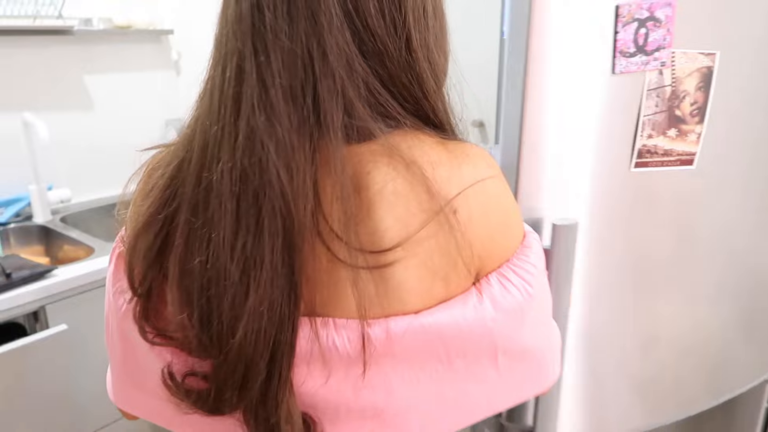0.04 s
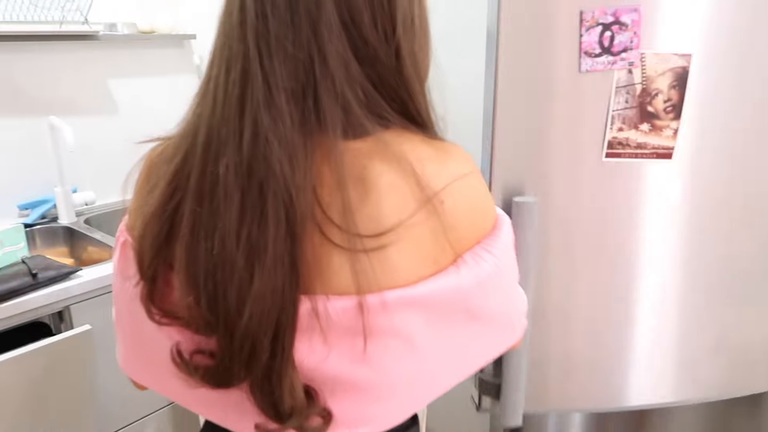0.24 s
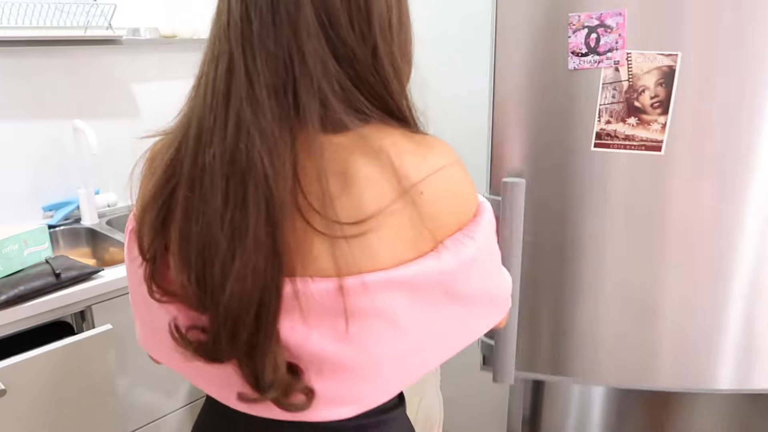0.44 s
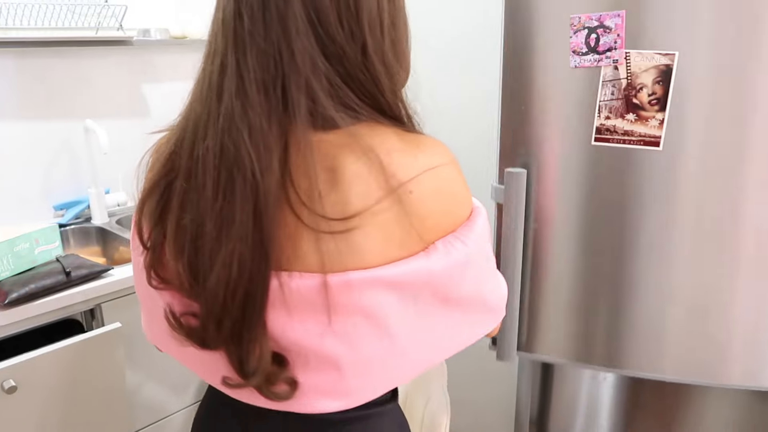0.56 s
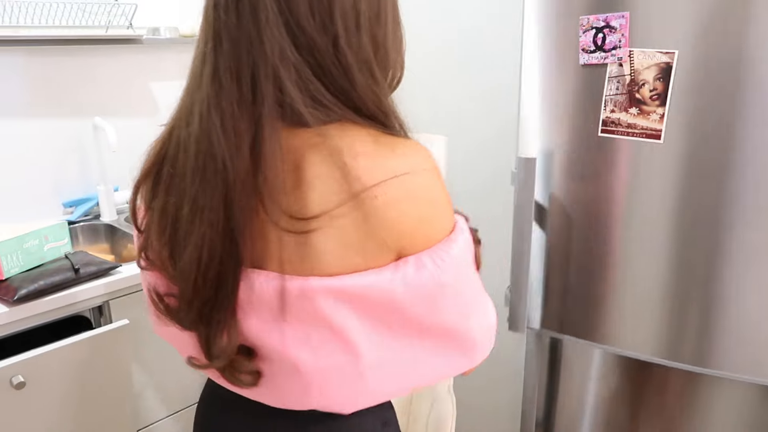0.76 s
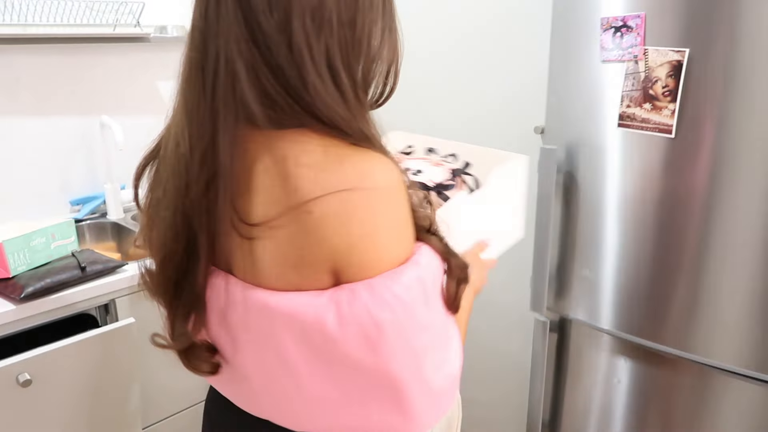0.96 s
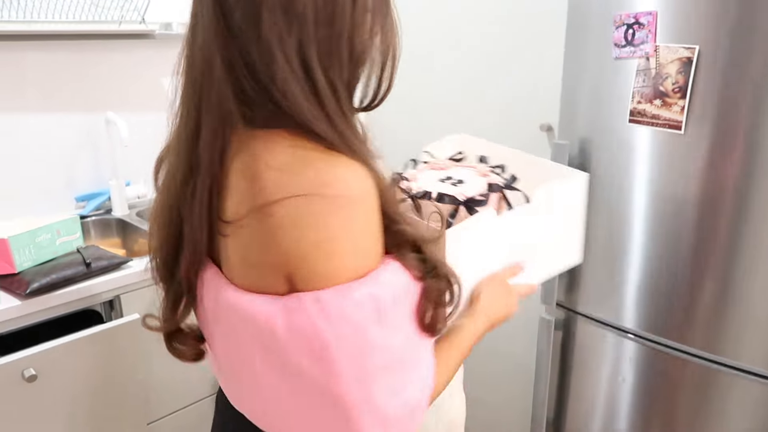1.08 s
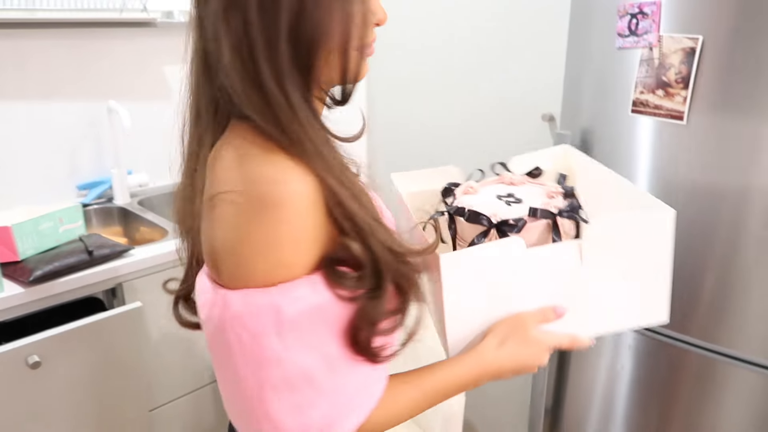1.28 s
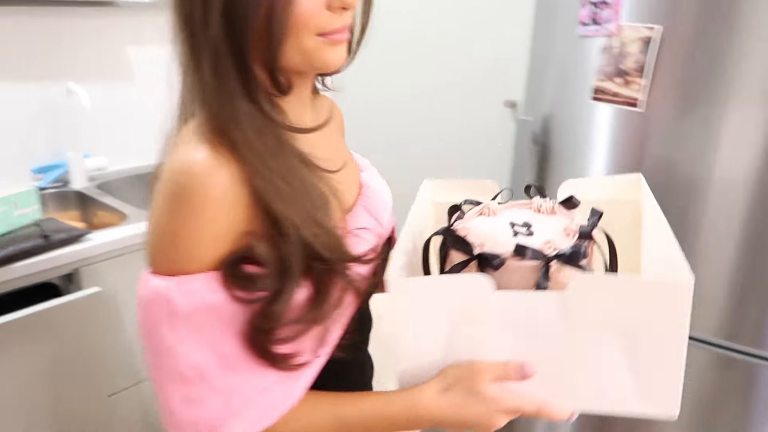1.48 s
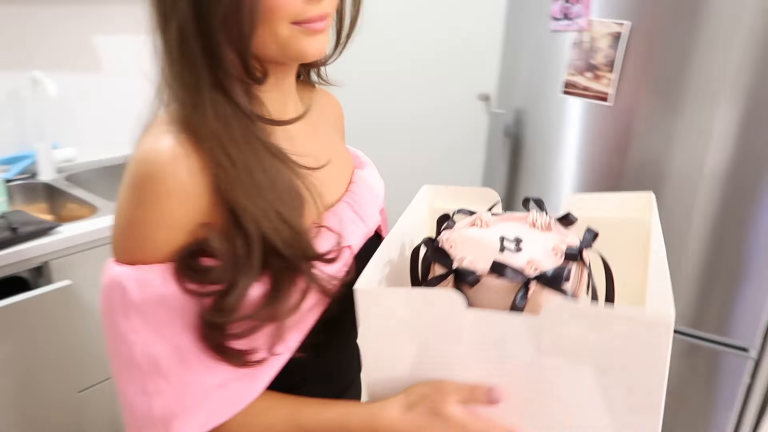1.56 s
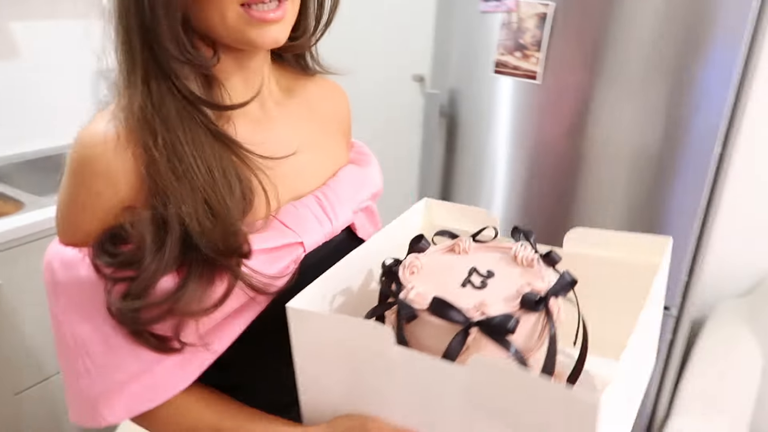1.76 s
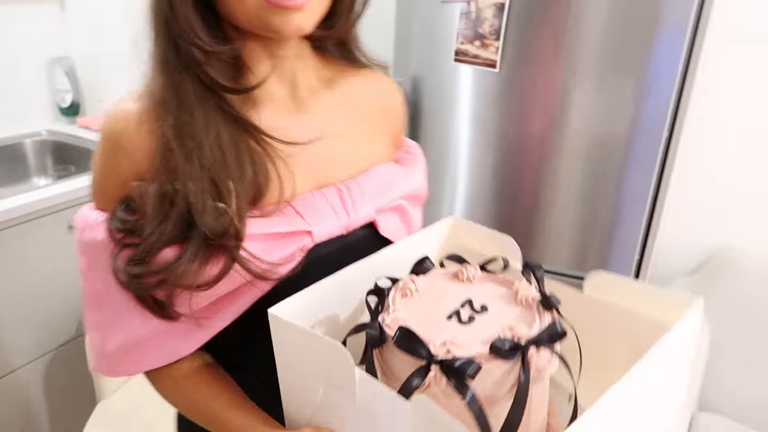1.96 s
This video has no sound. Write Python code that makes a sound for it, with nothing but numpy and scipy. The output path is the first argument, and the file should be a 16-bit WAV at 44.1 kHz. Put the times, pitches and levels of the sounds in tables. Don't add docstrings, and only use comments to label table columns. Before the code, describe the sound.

A fridge door shuts with one hard thud just past the middle, after soft cloth rustling and small shelf jolts; a brief rattle and short room echo follow, over faint air noise and hum, heard close.

```python
import sys
import numpy as np
from scipy import signal
from scipy.io import wavfile
from scipy.ndimage import uniform_filter1d

SR = 44100
rng = np.random.default_rng(int(sys.argv[2]) if len(sys.argv) > 2 else 0)


def makeup_ratio(level_db):
    decades = np.asarray(level_db, float) / 20
    return 10 ** decades


def bounce(signal):
    frames = np.transpose(np.atleast_2d(signal))
    limited = np.clip(frames, -1, 1)
    pcm = np.round(limited * 32767).astype(np.int16)
    wavfile.write(sys.argv[1], SR, pcm)


N = 89302
T = np.arange(N) / SR
BAND_EDGES_HZ = 20 * 2 ** np.arange(0, 9.7, .5)
SLAM_S = 1.134
MODE_SPREAD_DB = 4.5

# frequency_hz, side_minus_mid_db
AIR_SIDE = [(60, -14.5), (180, -2), (550, -1), (1650, -5.5), (4970, -3.5), (15000, 3.5)]
# frequency_hz, side_minus_mid_db
ROOM_SIDE = [(60, -63), (180, -59), (550, -24), (1650, -16), (4970, -3.5), (15000, 13.5)]


def rms_one(x):
    return x / np.sqrt(np.mean(x ** 2) + 1e-20)


def at_hz(points, hz):
    points = np.array(points)
    return np.interp(np.log(hz), np.log(points[:, 0]), points[:, 1])


def drift(rate_hz):
    pole = np.exp(-80 * np.pi * rate_hz / SR)
    white = rng.standard_normal(N // 40 + 2002)
    slow = signal.lfilter([1], [1, -2 * pole, pole * pole], white)[2000:]
    return np.interp(np.arange(N) / 40, np.arange(len(slow)), rms_one(slow))


def ring(clicks, hz, t60_s):
    radius = makeup_ratio(-60 / (t60_s * SR))
    angle = 2 * np.pi * hz / SR
    poles = [1, -2 * radius * np.cos(angle), radius * radius]
    return signal.lfilter([0, np.sin(angle)], poles, clicks + 1e-18)


def dull(x, hz):
    return signal.lfilter(*signal.butter(1, hz, fs=SR), x)


def bands(white, spectrum, side, shape):
    out = 0
    for k, (low, high) in enumerate(zip(BAND_EDGES_HZ, BAND_EDGES_HZ[1:])):
        band = signal.butter(2, [low, high], "band", fs=SR, output="sos")
        mid, difference = signal.sosfilt(band, white[k % 2])
        hz = np.sqrt(low * high)
        stereo = mid + makeup_ratio(at_hz(side, hz)) * difference * np.array([[1], [-1]])
        out = out + makeup_ratio(at_hz(spectrum, hz)) * shape(hz) * stereo
    return out


def swell(peak_s, db, rise_s, fall_s):
    rise = np.exp(-((T - peak_s) / rise_s) ** 2)
    fall = np.exp(-np.abs(T - peak_s) / fall_s)
    return makeup_ratio(db) * np.where(T < peak_s, rise, fall)


def rubs(spectrum, side):
    grains_per_s, spread_db = 4000, 2.5
    size = (2, 2, N)
    height = makeup_ratio(spread_db * np.minimum(rng.exponential(1, size), 5))
    sign = rng.choice([-1, 1], size)
    present = rng.random(size) < grains_per_s / SR
    return rms_one(bands(height * sign * present + 1e-18, spectrum, side, lambda hz: 1))


def room_air():
    # frequency_hz, level_db per Hz
    air_spectrum = [(20, -10), (60, -3), (200, 0), (500, -5), (1700, -12), (4000, -20), (12800, -32.5),
                    (14200, -46)]
    # time_s, level_db
    stir = [
        (0, 0.5),
        (.45, 0),
        (.55, -1.5),
        (.9, 0.5),
        (1.6, 0),
        (2.02, -0.5),
    ]
    level_db, top_hz = -50.5, 13740
    stir_db = np.interp(T, *np.transpose(stir))
    white = rng.standard_normal((2, 2, N))
    noise = rms_one(bands(white, air_spectrum, AIR_SIDE, lambda hz: makeup_ratio(1.04 * drift(13.4))))
    low_pass = signal.cheby1(6, 1, top_hz, fs=SR, output="sos")
    return signal.sosfilt(low_pass, makeup_ratio(level_db + stir_db) * noise)


def compressor_hum():
    # frequency_hz, level_db rms
    mains = [(50, -70), (100, -51.5), (200, -74.5)]
    # centre_s, level_db, width_s
    shakes = [
        (1.01, 9, 0.052),
        (1.37, -6.5, 0.092),
    ]
    wobble_db, wobble_hz = 1.3, 27
    shake_db = sum(db * np.exp(-((T - s) / width_s) ** 4) for s, db, width_s in shakes)
    out = 0
    for hz, db in mains:
        height = np.sqrt(2) * makeup_ratio(db + shake_db + wobble_db * drift(wobble_hz))
        out = out + height * np.sin(2 * np.pi * hz * T + 0.23 * drift(7.7))
    return out


def cloth():
    # peak_s, peak_db rms, rise_s, fall_s, cutoff_hz
    strokes = [(.0, -53.5, .01, 0.09, 5940), (.12, -50, 0.037, 0.11, 8300), (.27, -45.5, 0.022, 0.05, 714),
               (.36, -50.5, 0.066, 0.094, 4000), (.445, -42, 0.0089, 0.045, 800),
               (.67, -53.5, 0.055, 0.078, 5100), (.895, -44, 0.0064, 0.064, 2040),
               (1.57, -60, 0.018, 0.014, 7000), (1.687, -45.5, 0.015, 0.037, 5000),
               (1.88, -45.5, 0.017, 0.05, 800), (2.0, -53.5, .04, 0.047, 12100)]
    # frequency_hz, level_db per Hz
    cloth_spectrum = [(88, -40), (150, -6), (722, -10.5), (966, -13.5), (2270, -9.5), (5440, -14),
                      (12300, -19.5), (15500, -75)]
    friction = rubs(cloth_spectrum, AIR_SIDE)
    return sum(swell(*stroke) * dull(dull(friction, hz), hz) for *stroke, hz in strokes)


def shelf():
    # start_s, level_db, contact_cutoff_hz, rattle_s
    jolts = [(0.963, -41.5, 2000, 0.0033), (.969, -37, 1470, 0.0049), (1.031, -30.5, 506, 0.0025),
             (1.037, -34.5, 900, 0.0033), (1.042, -34.5, 2000, 0.0055), (1.049, -32, 1980, 0.0076),
             (1.062, -37, 1500, 0.0028), (1.67, -46, 900, 0.0064), (1.678, -45, 900, 0.0026),
             (1.696, -49.5, 900, 0.0066), (0.256, -42, 500, .006), (0.438, -40.5, 577, 0.01),
             (.885, -46.5, 2000, 0.027)]
    # frequency_hz, level_db, t60_s
    shelf_modes = [(250, -11, 0.046), (340, -19, 0.064), (394, -1.5, 0.056), (456, -8.5, 0.04),
                   (620, -11, 0.023), (780, -9.5, 0.025), (794, -9.5, 0.034), (1006, 1.5, 0.048),
                   (1180, -3, 0.023), (1390, -8.5, 0.026), (1770, -7, 0.027)]
    chance = rng.standard_normal((len(jolts), len(shelf_modes)))
    noise = rng.standard_normal(N)
    strikes = []
    for s, db, hz, rattle_s in jolts:
        decay = (T > s) * np.exp(-np.abs(T - s) / rattle_s)
        rattle = noise * decay * makeup_ratio(db) * np.sqrt(2 / rattle_s / SR)
        strikes.append(dull(dull(rattle, hz), hz))
    out = 0
    for (hz, db, t60_s), c in zip(shelf_modes, chance.T):
        drive = makeup_ratio(MODE_SPREAD_DB * c) @ np.array(strikes)
        out = out + makeup_ratio(db) * ring(drive, hz, t60_s)
    return out


def direct_sound(near):
    lag_s = 2.6e-5
    left = np.interp(T + lag_s / 2, T, near)
    right = np.interp(T - lag_s / 2, T, near)
    return np.array([left, right])


def kitchen(x):
    # frequency_hz, t60_s
    room_t60 = [(100, 0.62), (300, 0.4), (1000, 0.39), (4000, 0.38), (9000, 0.14)]
    # frequency_hz, level_db
    room_colour = [(60, 2), (250, 1.5), (1000, 2.5), (2000, 1), (4000, -2.5), (6000, 5.5), (12000, -9.5)]
    level_db, rise_s = -7, 0.003
    t = T[:SR]
    white = rng.standard_normal((2, 2, SR))
    tail = bands(white, room_colour, ROOM_SIDE, lambda hz: makeup_ratio(-60 * t / at_hz(room_t60, hz)))
    tail = tail * (1 - np.exp(-t / rise_s))
    tail = tail / np.sqrt(np.sum(tail ** 2) / 2)
    return makeup_ratio(level_db) * signal.fftconvolve(x[None], tail, axes=1)[:, :N]


def nudge():
    # frequency_hz, level_db per Hz
    nudge_spectrum = [(200, -30), (400, -4), (800, -8.5), (1500, 2), (2140, 1.5), (3400, -3.5), (6250, -16),
                      (12000, -28.5), (15500, -34)]
    stroke = swell(peak_s=.982, db=-32, rise_s=0.01, fall_s=.013)
    return stroke * rubs(nudge_spectrum, ROOM_SIDE)


def door():
    # after_slam_s, skin_db, cabinet_db, contact_cutoff_hz
    contacts = [(-.0165, -31, -28, 1190), (-.007, -34, -27.5, 1510), (0, -8.5, -7.5, 2380),
                (.0045, -13, -19.5, 4000), (.0085, -9, -22, 5840), (.0135, -8.5, -17.5, 2220),
                (.017, -14.5, -17.5, 3360), (.033, -22, -13.5, 3000), (0.054, -24.5, -23, 2440),
                (.09, -26, -21, 2500), (.154, -34.5, -32, 1970)]
    # frequency_hz, level_db, t60_s
    skin_modes = [(733, -8, 0.038), (806, -9.5, 0.011), (1117, -3, 0.022), (1288, -4.5, 0.035),
                  (1430, -4.5, 0.031), (1609, 2, 0.027), (1852, 1, 0.036), (2130, -3.5, 0.042),
                  (2306, -7, 0.031), (2752, 3.5, 0.018), (3033, 6, 0.017), (3330, 4, 0.0096),
                  (3800, 2, 0.0082), (4190, -1, 0.01)]
    # frequency_hz, level_db, t60_s
    cabinet_modes = [(58, -33, 0.18), (103.5, -12.5, 0.23), (148, -17.5, 0.15), (172, -9, 0.077),
                     (223, -7, 0.072), (271.5, -6, 0.085), (284, -3, 0.052), (369, -3, 0.058),
                     (414, -14, 0.039), (481, -7.5, 0.065)]
    skin_level_db, cabinet_level_db = -3.5, -5.5
    crack_db, crack_t60_s, crack_low_hz = -7, 0.033, 900
    hard_hz = 4000
    out = np.zeros(N)
    t = T[:SR // 2]
    click = (t == 0) * 1.
    chance = rng.standard_normal((len(contacts), len(skin_modes) + len(cabinet_modes)))
    high_pass = signal.butter(2, crack_low_hz, "high", fs=SR, output="sos")
    cracks = signal.sosfilt(high_pass, rng.standard_normal((len(contacts), SR // 2)))
    for (s, skin_db, cabinet_db, cut_hz), c, noise in zip(contacts, chance, cracks):
        skin, cabinet = 0, 0
        for k, ((hz, db, t60_s), g) in enumerate(zip(skin_modes, c)):
            skin = skin + makeup_ratio(db + MODE_SPREAD_DB * g) * (-1) ** k * ring(click, hz, t60_s)
        for (hz, db, t60_s), g in zip(cabinet_modes, c[len(skin_modes):]):
            cabinet = cabinet + makeup_ratio(db + MODE_SPREAD_DB * g) * ring(click, hz, t60_s)
        crack = makeup_ratio(crack_db - 60 * t / crack_t60_s) * noise * cut_hz / hard_hz
        bright = makeup_ratio(skin_level_db) * dull(skin, cut_hz) + crack
        blow = makeup_ratio(skin_db) * dull(bright, cut_hz) - makeup_ratio(cabinet_db + cabinet_level_db) * cabinet
        i = int((SLAM_S + s) * SR)
        out[i:i + SR // 2] += blow
    return out


def sway():
    start_s, hz, level_db, rise_s, t60_s = 1.125, 30.93, -15, 0.022, .5
    t = np.maximum(T - start_s, 0)
    envelope = makeup_ratio(level_db - 60 * t / t60_s) * (1 - np.exp(-t / rise_s))
    return envelope * np.sin(2 * np.pi * hz * t)


def slam_noise():
    # frequency_hz, level_db per Hz
    slam_noise_spectrum = [(150, -2), (220, 1), (500, -4), (1100, -2), (1800, -9), (2550, -3), (4200, -10),
                           (6000, -24)]
    level_db, t60_s, rise_s = -28, 0.28, .004
    t = np.maximum(T - SLAM_S, 0)
    spectrum = [(60, -30), *slam_noise_spectrum, (12000, -49)]
    noise = rms_one(bands(rng.standard_normal((2, 2, N)), spectrum, ROOM_SIDE, lambda hz: 1))
    return makeup_ratio(level_db - 60 * t / t60_s) * (1 - np.exp(-t / rise_s)) * noise


def ticks():
    # start_s, level_db, pitch_hz, t60_s
    tick_table = [
        (1.7957, -40.5, 11400, 0.0023),
        (1.7957, -61, 6300, .003),
        (1.8493, -42, 9500, 0.001),
    ]
    mono = sum(makeup_ratio(db) * ring((np.arange(N) == int(s * SR)) * 1., hz, t60_s) for s, db, hz, t60_s in tick_table)
    return mono * makeup_ratio(np.array([[2.5], [-2.5]]))


def scene():
    background = room_air() + compressor_hum() + cloth()
    near = shelf() + door()
    rub = nudge()
    struck = direct_sound(near) + rub + kitchen(near + rub.mean(axis=0))
    return background + struck + sway() + slam_noise() + ticks()


def top_cut(x):
    return signal.sosfilt(signal.butter(12, 15890, fs=SR, output="sos"), x)


def record(dry):
    duck_db, threshold_db, recover_db_per_s = 4, -33, 9.5
    power = uniform_filter1d(dry.mean(axis=0) ** 2, size=441)
    level_db = 10 * np.log10(power + 1e-12)
    duck = duck_db * np.clip((level_db - threshold_db) / 10, 0, 1)
    recovery = recover_db_per_s * T
    duck = np.maximum.accumulate(duck + recovery) - recovery
    mix = dry * makeup_ratio(-uniform_filter1d(duck, size=441))
    return top_cut(mix)


dry = scene()
out = record(dry)
bounce(out)
```